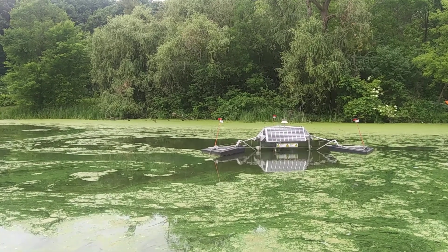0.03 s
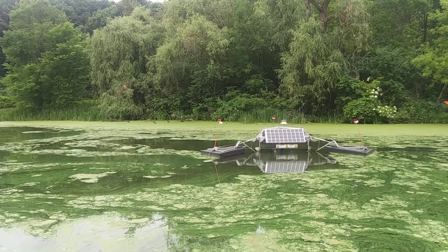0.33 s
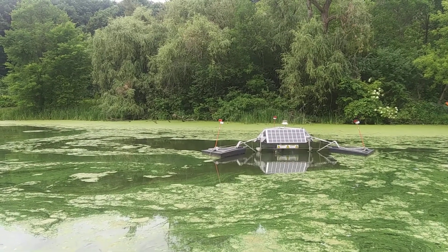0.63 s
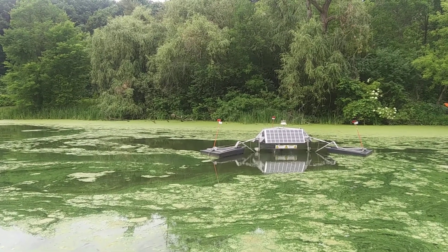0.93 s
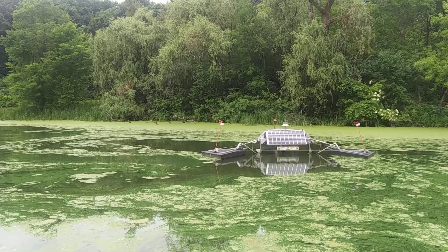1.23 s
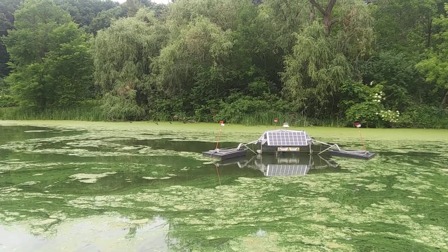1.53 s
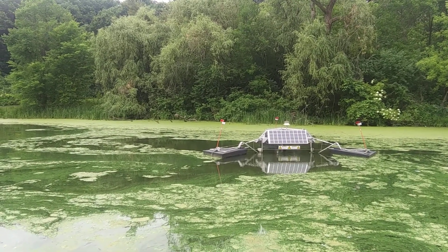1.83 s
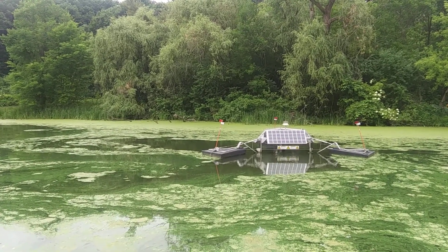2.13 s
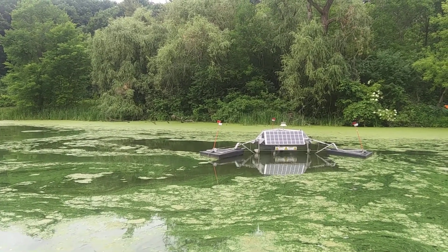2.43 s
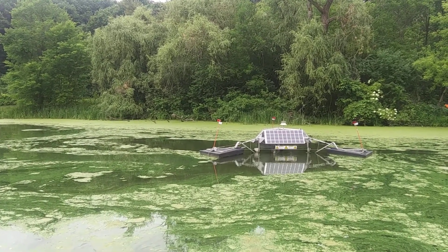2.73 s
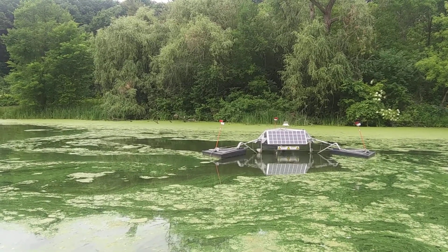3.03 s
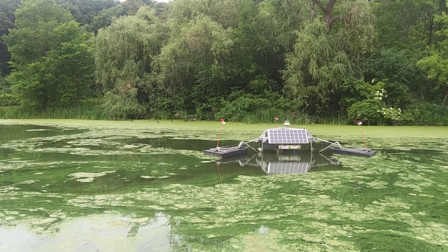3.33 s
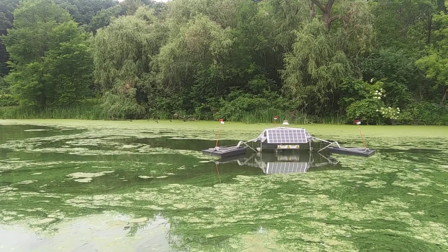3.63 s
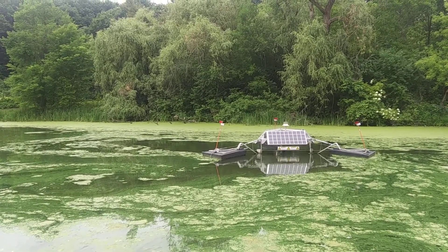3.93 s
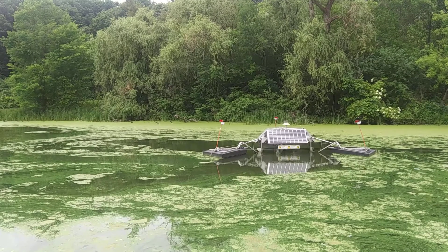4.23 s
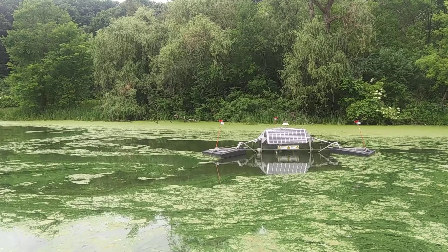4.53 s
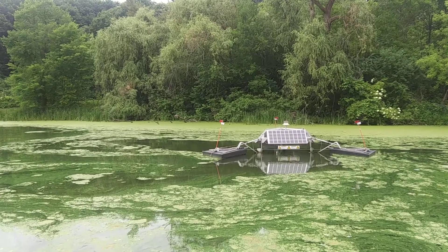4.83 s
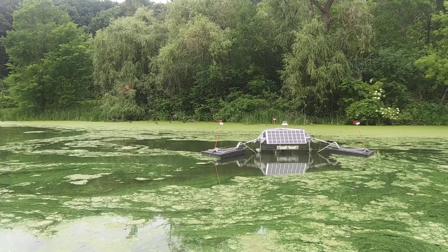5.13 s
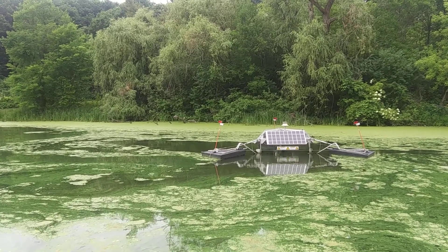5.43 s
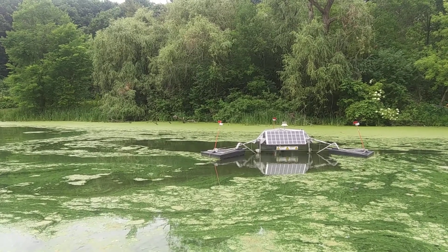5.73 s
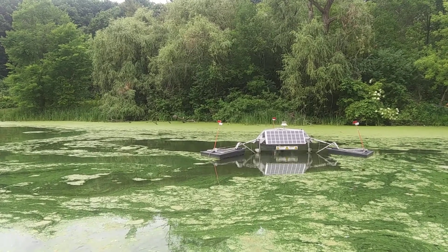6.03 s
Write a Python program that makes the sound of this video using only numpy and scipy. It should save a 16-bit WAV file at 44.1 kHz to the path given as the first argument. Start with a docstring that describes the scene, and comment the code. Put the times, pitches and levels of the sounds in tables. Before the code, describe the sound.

Beside a wooded pond, a blackbird close to the microphone gives a few quick notes and a loud, buzzy trill that echoes briefly in the trees. Small birds then chirp, warble and whistle faintly in the distance. Near the end a second blackbird sings a shorter, quieter trill from further off. A soft outdoor hush with a very faint steady whine lies underneath.

```python
"""A few quick notes, then a buzzy trill: a blackbird sings close by in the reeds of a wooded pond, and
later a second one further off. The syrinx is a double sound source: in each syllable one side holds a
low tone while the other whips down from a high one, and slapping membranes ring the throat into a rasp.
Small birds chirp and whistle in the trees. Reeds and trunks scatter the song into reverberation,
over a soft outdoor hush and a faint steady whine."""
import sys
import numpy as np
from scipy import signal
from scipy.fft import rfft, irfft
from scipy.io import wavfile
from scipy.ndimage import uniform_filter1d

SR = 44100
rng = np.random.default_rng(int(sys.argv[2]) if len(sys.argv) > 2 else 0)


def generate_wav(sig):
    """Save sig (samples, or channels by samples) to the path in sys.argv[1] as 16-bit PCM at SR."""
    pcm = np.round(np.clip(np.atleast_2d(sig).T, -1, 1) * 32767).astype(np.int16)
    wavfile.write(sys.argv[1], SR, pcm)


N = 272979
TIME = np.arange(N) / SR


def near_trill():
    """Two-voice phonation in the close blackbird: a hard whip, then a long held tone."""
    # vocal effort: time_s, level_db, low_side_db
    effort = [(.198, -35.5, -16), (.204, -41.5, -8), (.23, -44, -1.5), (.3, -41.5, -2.5), (.45, -44.5, 1),
              (.72, -43.5, 1.5), (.86, -47, 5), (0.882, -47.5, 8), (.903, -54, -16)]
    # throat resonances: centre_hz, width_hz, gain_db
    throat = [(1620, 490, -15.5), (2250, 280, -17), (3260, 320, 2.5), (3760, 320, 0), (4400, 330, -13),
              (4987, 95, 3.5), (5376, 170, -5), (5870, 130, -21)]
    # a tempo that starts fast and settles: time_s, syllables_per_s
    tempo = [(.195, 40.5), (.22, 48), (.245, 42), (.327, 34.64), (.467, 33.77), (.537, 37.72),
             (.607, 32.47), (.687, 34.03), (.867, 32.01)]
    share, singing = syllables(tempo, start_s=.195, end_s=.902)
    low = low_side(share, enters=.257, pitch_hz=2692, sharp_hz=109.94, settle=.25,
                   attack=.13, hold=.45, release=.41, peak_db=2.5, rest_db=-16)
    high = high_side(share, top_hz=5187, bottom_hz=3323, fall=.1,
                     attack=.035, hold=.12, release=.1, peak_db=2, rest_db=-12.5)
    return trill(share, singing, effort, low, high, throat, rasp_db=-3, breath_db=-1,
                 reeds_db=-7, overtone_db=-38, rough_hz=87.8, wander=.00626)


def far_trill():
    """Two-voice phonation in the further blackbird: the held tone enters at once and fades early."""
    # vocal effort: time_s, level_db, low_side_db
    effort = [(5.69, -53, -7), (5.75, -53.5, -0.8), (5.85, -52.5, -1.5), (6.0, -54, 1.3), (6.19, -55, 1.5)]
    # throat resonances: centre_hz, width_hz, gain_db
    throat = [(2950, 290, 8.5), (3280, 120, 5), (3730, 150, 2), (4200, 180, -20), (4960, 150, -1),
              (5040, 110, 10), (5460, 280, -11)]
    # a nearly even tempo: time_s, syllables_per_s
    tempo = [(5.696, 34.53), (5.826, 31.88), (6.176, 34.03)]
    share, singing = syllables(tempo, start_s=5.6925, end_s=6.21)
    low = low_side(share, enters=.081, pitch_hz=2656, sharp_hz=268, settle=.06,
                   attack=.056, hold=.28, release=.39, peak_db=0, rest_db=-16)
    high = high_side(share, top_hz=5380, bottom_hz=3680, fall=.11,
                     attack=.027, hold=.076, release=.18, peak_db=-3.5, rest_db=-14.5)
    return trill(share, singing, effort, low, high, throat, rasp_db=-7, breath_db=3,
                 reeds_db=-3.5, overtone_db=-40, rough_hz=109, wander=.00578)


def trill(share, singing, effort, low, high, throat,
          rasp_db, breath_db, reeds_db, overtone_db, rough_hz, wander):
    """Superposition of two syrinx tones and a source-filter rasp; echoes off the reeds smear the whip."""
    level_db, low_db = read(effort, TIME)
    gain = undb(level_db) * singing
    hold_hz, hold_db = low
    whip_hz, whip_db = high
    hold_hz = hold_hz * (1 + wander * walk(30.8))
    hold = syrinx(hold_hz + 25 * walk(370), gain * undb(hold_db + low_db + 1.4 * walk(170)), overtone_db)
    whip = syrinx(whip_hz + rough_hz * walk(385), gain * undb(whip_db + 2.1 * walk(42)), overtone_db)
    # the membranes slap shut about every fifth cycle of the low tone, and each slap rings the throat
    slap_phase = phase_of(hold_hz / 5 * (1 + .02 * walk(250)))
    pulses = sum(np.cos(k * slap_phase) for k in range(2, 13))
    slaps = unit(resonate(pulses, throat))
    breath = undb(breath_db) * unit(resonate(rng.standard_normal(N), throat))
    throb_db = 1.4 * np.cos(2 * np.pi * (share - .07))  # the rasp is strongest during the whip
    rasp = unit(slaps + breath) * gain * undb(rasp_db + throb_db)
    return hold + whip + rasp + undb(reeds_db) * echo(whip, t60_s=.067, build_s=.005)


def syllables(tempo, start_s, end_s):
    """Phase of a repeating gesture: the share (0-1) of each syllable elapsed, and a gate for the trill."""
    beats = [start_s]
    while beats[-1] < end_s:
        beats.append(beats[-1] + 1 / read(tempo, beats[-1])[0])
    share = np.interp(TIME, beats, np.arange(len(beats))) % 1
    singing = np.clip(np.minimum(TIME - start_s, end_s - TIME) / .001, 0, 1)
    return share, singing


def high_side(share, top_hz, bottom_hz, fall, rise=.07, **shape):
    """Frequency sweep and level of the whip: it drops as a syllable opens and climbs as it closes."""
    height = np.maximum(1 / (1 + (share / fall) ** 4), 1 - (1 - share) / rise)
    return bottom_hz + (top_hz - bottom_hz) * rounded(height), envelope(share, **shape)


def low_side(share, enters, pitch_hz, sharp_hz, settle, **shape):
    """Pitch and level of the held tone: it enters sharp and relaxes exponentially."""
    since = (share - enters) % 1
    return pitch_hz + sharp_hz * np.exp(-since / settle), envelope(since, **shape)


def envelope(share, attack, hold, release, peak_db, rest_db):
    """Amplitude envelope in dB: it rises, holds and falls back; times are shares of a syllable."""
    corners = np.cumsum([0, attack, hold, release])
    return rounded(np.interp(share, corners, [rest_db, peak_db, peak_db, rest_db]))


def rounded(control):
    """Muscles move smoothly: a moving average rounds a gesture's corners over a millisecond."""
    return uniform_filter1d(control, size=SR // 1000)


def syrinx(hz, gain, overtone_db):
    """Nearly sinusoidal oscillation: a pure tone with a faint sheen of harmonics."""
    phase = phase_of(hz)
    sheen = undb(overtone_db) * beak(gain * overtones(phase), gain)
    return np.sqrt(2) * (gain * np.sin(phase) + sheen)


def overtones(phase):
    """Harmonics of a syrinx tone, at whole multiples of its fundamental."""
    return sum(np.sin(k * phase) for k in (2, 3, 5))


def beak(harmonics, gain, air=1.66):
    """Radiation from the open beak filters ragged harmonics and rushing air."""
    # radiation spectrum: frequency_hz, gain_db
    radiation = [(4500, -15), (6200, 2), (7000, -3.5), (7900, 1), (9300, -10), (11300, -2), (12200, 10),
                 (12800, -4), (13300, 6), (13900, 0), (14800, 8), (15700, -1)]
    ragged = harmonics * (.5 + .5 * walk(700))
    return colour(ragged + air * gain * rng.standard_normal(N), radiation)


def lead_in(buzz_hz=310, overtone_db=-31.5):
    """Quick overlapping notes open each song; fast frequency modulation makes some of them buzz."""
    # notes from both sides of the syrinx: start_s, length_s, pitch_hz, glide_hz, level_db, depth_hz
    lead_notes = [ (-.02, 0.053, 1390, -150, -50, 5), (0.032, 0.045, 3200, -100, -56, 200),
                  (.109, .046, 2516, 54, -35, 137), (0.137, 0.025, 5200, 354, -48, 203),
                  (.1515, .021, 5090, 0, -30.5, 0), (0.172, 0.041, 5420, -2, -48, 300),
                  (0.168, 0.017, 3980, -550, -49, 500), (.185, 0.0074, 3340, -600, -35, -5),
                  (.1945, 0.0054, 3960, -300, -33, 0), (5.636, 0.016, 5120, -150, -55, 60),
                  (5.6395, 0.011, 3356, -60, -49.5, 4), (5.655, 0.05, 5460, -250, -67.5, 253),
                  (5.65, 0.015, 3000, -600, -59, 350), (5.66, 0.04, 2688, -90, -51.5, 51)]
    flutter = np.sin(phase_of(buzz_hz * (1 + .195 * walk(75)))) + .26 * walk(850)
    tone, harmonics, effort = np.zeros((3, N))
    for *row, depth_hz in lead_notes:
        span, hz, gain = chirp(*row, edge=.33, arch_hz_per_s=700)
        phase = phase_of(hz + depth_hz * flutter[span])
        tone[span] += gain * np.sin(phase)
        harmonics[span] += gain * overtones(phase)
        effort[span] += gain
    return np.sqrt(2) * (tone + undb(overtone_db) * beak(harmonics, effort))


def chirp(start_s, length_s, pitch_hz, glide_hz, level_db, edge, arch_hz_per_s):
    """A frequency glide bent into an arch: the longer the note, the higher the arch."""
    span, progress, gain = note(start_s, length_s, level_db, edge)
    arch_hz = arch_hz_per_s * length_s * np.sin(np.pi * progress)
    return span, pitch_hz + glide_hz * (progress - .5) + arch_hz, gain


def small_birds():
    """Short frequency glides from the trees: calls, faint twitter and a warbler's slurs."""
    # songbird calls: start_s, length_s, pitch_hz, glide_hz, level_db
    calls = [ (.265, .04, 1680, -350, -65), (.308, 0.017, 2250, -180, -57.5), (.398, .052, 1976, -450, -62),
             (.41, 0.016, 1516, 100, -60), (1.46, .05, 2055, 38, -67.5), (2.05, .08, 3610, -350, -77),
             (2.175, 0.044, 2110, -30, -64), (2.345, .035, 4200, -700, -75), (2.38, 0.038, 3700, -200, -75),
             (2.57, 0.041, 2120, -150, -63), (3.615, 0.032, 1790, 254, -71), (3.69, .075, 1890, 104, -72),
             (4.44, 0.068, 1827, 230, -72.5), (4.51, 0.064, 1765, -400, -72),
             (4.895, 0.032, 5900, 0, -74.5), (5.0, 0.03, 5850, -200, -75), (5.335, 0.032, 2470, 322, -66.5),
             (5.39, .025, 1210, 351, -71)]
    # the warbler's slurs: start_s, length_s, direction (+1 up, -1 down), level_db
    slurs = [(2.35, 0.077, -1, -76), (2.627, 0.025, 1, -70.5), (2.775, .05, 1, -72.5),
             (2.889, 0.061, -1, -67), (3.03, .038, 1, -68.5), (3.108, 0.046, -1, -71),
             (3.227, 0.03, 1, -70), (3.307, 0.036, -1, -71.5), (3.503, 0.0268, -1, -68.5),
             (3.595, 0.04, 1, -74), (3.645, .022, 1, -73), (3.674, .072, -1, -68.5)]
    notes = [chirp(*row, edge=.11, arch_hz_per_s=1900) for row in list(calls) + twitter()]
    return pure_tones(notes + [slur(*row) for row in slurs], waver_hz=21.4, flicker_db=1.5)


def slur(start_s, length_s, direction, level_db, hz_per_s=14500, top_hz=3400, bottom_hz=2450):
    """A linear sweep at one speed that ends at the top or the bottom of the warbler's range."""
    span, progress, gain = note(start_s, length_s, level_db, edge=.22)
    end_hz = top_hz if direction > 0 else bottom_hz
    return span, end_hz - np.sign(direction) * hz_per_s * length_s * (1 - progress), gain


def twitter(count=22, low_hz=1625, high_hz=5180, typical_s=.026, glide_hz=600, level_db=-83.5):
    """A random process: rows of faint chirps, spread uniformly over time and log frequency."""
    return [(when * N / SR, typical_s * (.5 + length), low_hz * (high_hz / low_hz) ** pitch,
             glide_hz * (2 * glide - 1), level_db)
            for when, length, pitch, glide in rng.random((count, 4))]


def far_whistles(lowest_at=.64, swell_db=6):
    """Slow modulation: each long note swells while its pitch sags and partly recovers."""
    # whistles from across the water: start_s, length_s, pitch_hz, sag_hz, base_db
    whistles = [(0.113, 0.061, 1410, 7, -66), (1.24, .33, 4200, 160.5, -82.5),
                (1.92, 0.23, 3600, -1, -81.5), (3.24, .37, 4110, 235, -75), (3.81, 0.14, 3490, 3, -79.5),
                (5.13, 0.073, 1165, 10, -75), (5.149, 0.34, 4067, 139, -78.5),
                (5.46, 0.29, 2233, 12, -73.5), (5.472, 0.13, 6680, 7, -72.5)]
    notes = []
    for start_s, length_s, pitch_hz, sag_hz, base_db in whistles:
        span, progress, gain = note(start_s, length_s, base_db, edge=.38)
        hz = pitch_hz - sag_hz * np.sin(np.pi / 2 * progress / lowest_at)
        notes.append((span, hz, gain * undb(swell_db * (progress + .5))))
    return pure_tones(notes, waver_hz=18.3, flicker_db=1)


def pure_tones(notes, waver_hz, flicker_db):
    """Distant songbird notes: sinusoids with slight random modulation of frequency and amplitude."""
    out = np.zeros(N)
    bend_hz = waver_hz * walk(70)
    flicker = undb(flicker_db * walk(27))
    for span, hz, gain in notes:
        out[span] += np.sqrt(2) * gain * flicker[span] * np.sin(phase_of(hz + bend_hz[span]))
    return out


def buzzes():
    """Scattering by the trees blurs far trills into noise bands that swell and fade."""
    # blurred songs: start_s, length_s, centre_hz, width_hz, level_db
    songs = [(-.04, 0.32, 2680, 905, -61), (-.04, 0.22, 5400, 1510, -72.5), (0.95, 0.37, 7350, 720, -80.5),
             (1.0, 1.5, 3260, 170, -78), (1.05, .4, 4380, 250, -84), (1.202, 2.85, 2590, 550, -78.5),
             (1.823, 0.53, 5440, 1080, -78.5), (3.846, 0.56, 5570, 1390, -80.5),
             (4.65, 0.42, 2470, 1100, -78.5)]
    out = np.zeros(N)
    for start_s, length_s, centre_hz, width_hz, level_db in songs:
        span, _, gain = note(start_s, length_s, level_db, edge=.1)
        band = unit(resonate(rng.standard_normal(N), [(centre_hz, width_hz, 0)]))
        band *= undb(2.1 * walk(23))
        out[span] += gain * band[span]
    return out


def echo(x, t60_s, build_s):
    """Reverberation: dense scattered reflections of unit energy build up, then decay exponentially."""
    t = TIME[:SR * 2]
    decay = np.exp(-np.log(1000) * t / t60_s)
    onset = 1 - np.exp(-(t / build_s) ** 2)
    response = rng.standard_normal(len(t)) * decay * onset
    return signal.fftconvolve(x, response / np.linalg.norm(response))[:N]


def hush(base_db=-66.5, whine_hz=1173, whine_db=-81):
    """Broadband noise of a far-off town and leaves: a swelling murmur, a smooth hiss, a thin whine."""
    # spectral density of the hush: frequency_hz, relative_db
    spectrum = [(18, -59), (30, -23), (117, -25), (202, -11), (389, -3.5), (432, -1), (897, -1.5),
                (1080, -3), (1170, -6), (1260, -4.5), (2910, -8.5), (7080, -16), (15500, -19)]
    # swell of the murmur: time_s, gain_db
    swell = [(0, 1.5), (.25, 4), (.7, 4), (.95, 1), (1.2, 0), (3, 0), (4.5, 0), (6.19, .5)]
    air = unit(colour(rng.standard_normal(N), spectrum)) * undb(base_db)
    murmur = signal.sosfiltfilt(signal.butter(2, 1800, fs=SR, output="sos"), air)
    hiss = (air - murmur) * undb(-.5)
    whine = np.sqrt(2) * np.sin(phase_of(whine_hz + 3 * walk(15.5))) * undb(whine_db + .9 * walk(15))
    return murmur * undb(read(swell, TIME)[0] + .39 * walk(1.5)) + hiss + whine


def note(start_s, length_s, level_db, edge):
    """A tapered window: samples, progress (0-1) and gain of a note; edge is each fade's share."""
    span = np.flatnonzero((TIME >= start_s) & (TIME < start_s + length_s))
    progress = (TIME[span] - start_s) / length_s
    ramp = np.minimum(np.minimum(progress, 1 - progress) / edge, 1)
    return span, progress, undb(level_db) * np.sin(np.pi / 2 * ramp)


def resonate(x, modes):
    """Parallel resonances, each steepened by a cascade of two band-pass filters."""
    out = 0
    for centre_hz, width_hz, gain_db in modes:
        b, a = signal.iirpeak(centre_hz, centre_hz / (1.5 * width_hz), fs=SR)
        out = out + undb(gain_db) * signal.lfilter(b, a, signal.lfilter(b, a, x))
    return out


def colour(x, points):
    """Spectral shaping by a curve through (frequency_hz, gain_db) points."""
    hz, db = np.transpose(points)
    freq = np.fft.rfftfreq(2 * N, 1 / SR)
    gain = undb(np.interp(np.log(freq + 1), np.log(hz), db))
    return irfft(rfft(x, 2 * N) * gain)[:N]


def walk(rate_hz):
    """Smooth random fluctuation: noise low-passed at rate_hz, with rms 1."""
    freq = np.fft.rfftfreq(N, 1 / SR)
    return unit(irfft(rfft(rng.standard_normal(N)) / (1 + (freq / rate_hz) ** 4), N))


def phase_of(hz):
    """Phase in radians is the running integral of frequency."""
    return 2 * np.pi * np.cumsum(hz) / SR


def read(table, at):
    """Linear interpolation of a table's columns along its first."""
    key, *columns = np.transpose(table)
    return [np.interp(at, key, column) for column in columns]


def undb(db):
    """Decibels to amplitude gain."""
    return 10 ** (np.asarray(db) / 20)


def unit(x):
    """Normalisation to rms 1."""
    return x / np.sqrt(np.mean(x ** 2))


def scene():
    """Superposition of direct birdsong, its reflections from reeds and trees, and the hush."""
    lead, near, far = lead_in(), near_trill(), far_trill()
    chirps, whistles = small_birds(), far_whistles()
    reeds = echo(undb(-11) * lead + undb(-8) * chirps, t60_s=.14, build_s=.0038)
    # the trees throw the high notes back more strongly than the low tone
    bright = colour(near + lead, [(2700, -19.5), (3300, -13.5), (5000, -13.5), (8000, -4)])
    distant = undb(-10) * far + undb(-5.5) * chirps + undb(-7) * whistles
    trees = echo(bright + distant, t60_s=1, build_s=.023)
    return (lead + near + far + chirps + whistles + buzzes() + reeds + trees + hush())[None]


def record(dry, top_hz=15600):
    """Band limiting: a steep low-pass filter cuts the highest treble."""
    return signal.sosfilt(signal.ellip(10, .1, 70, top_hz, fs=SR, output="sos"), dry)


dry = scene()
out = record(dry)
generate_wav(out)
```